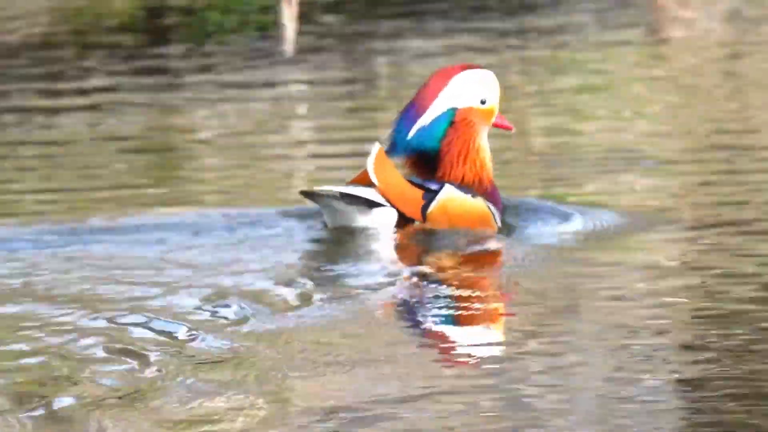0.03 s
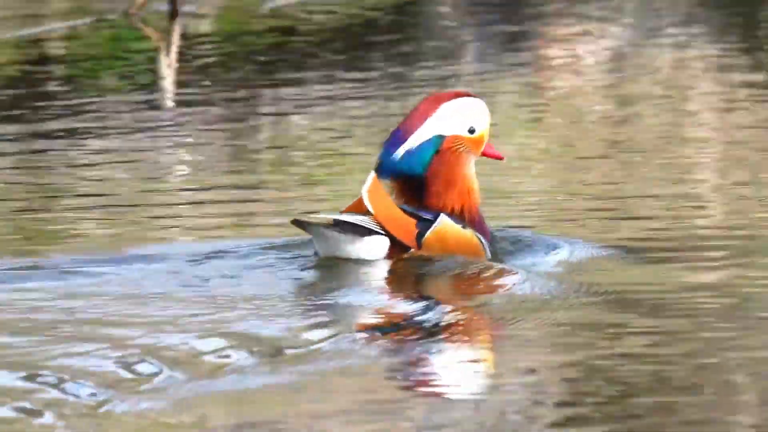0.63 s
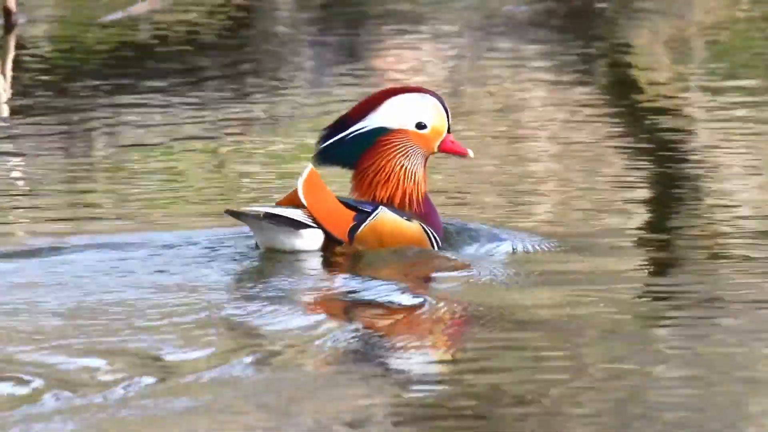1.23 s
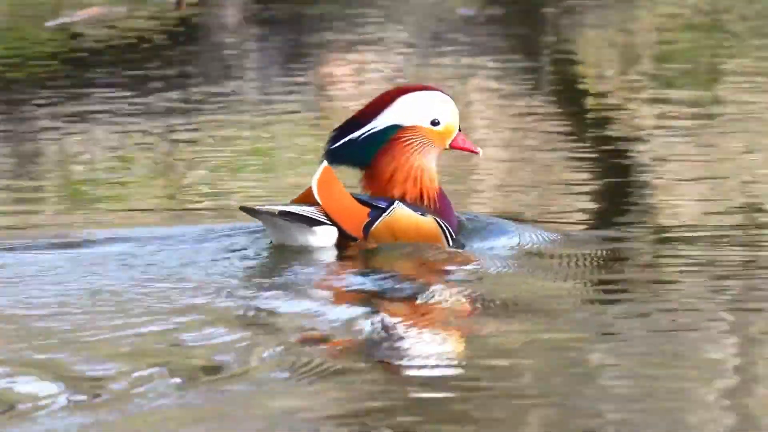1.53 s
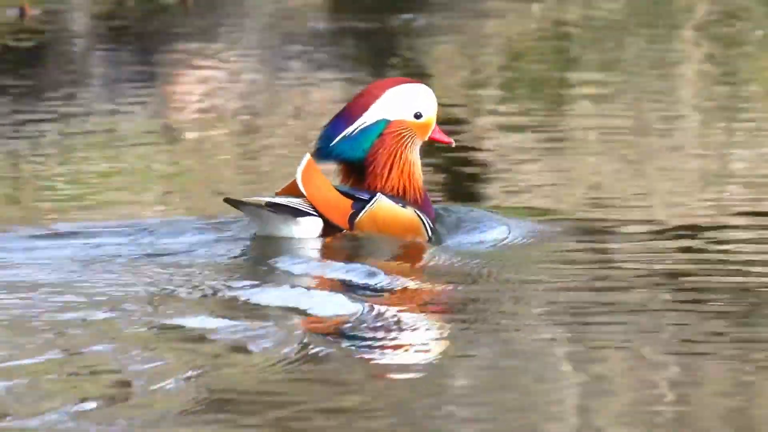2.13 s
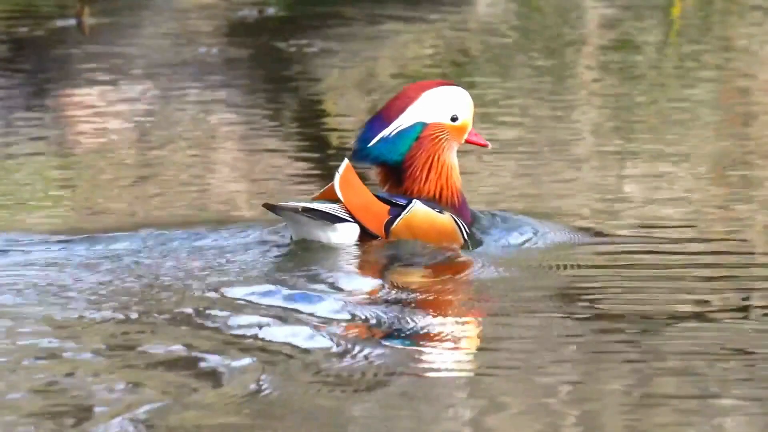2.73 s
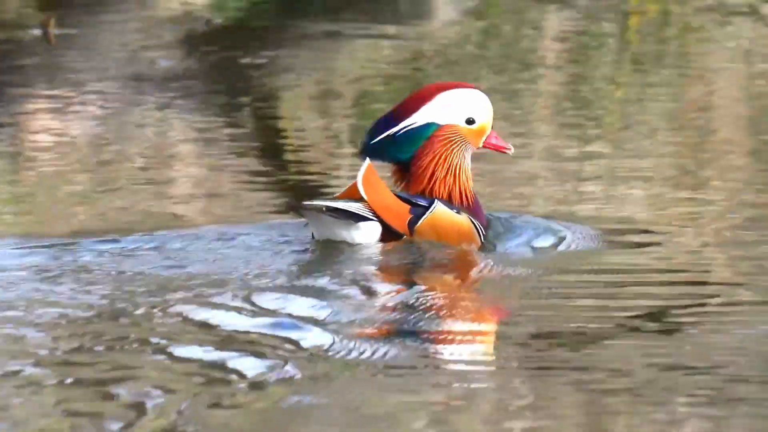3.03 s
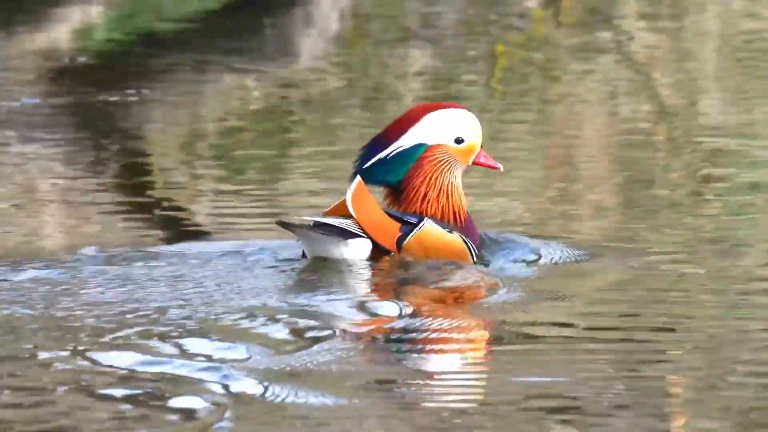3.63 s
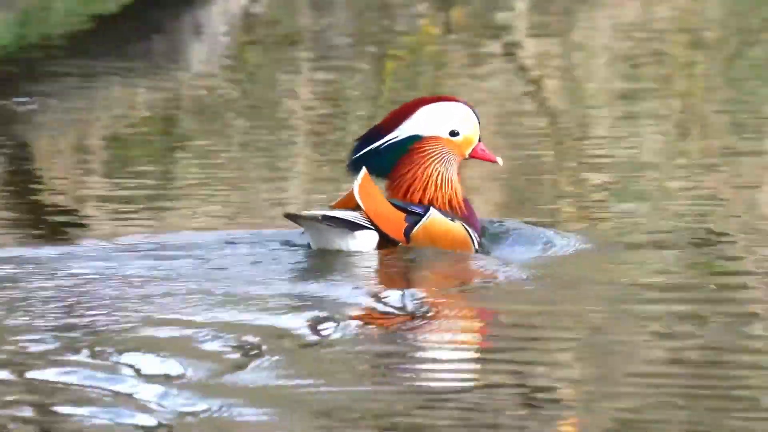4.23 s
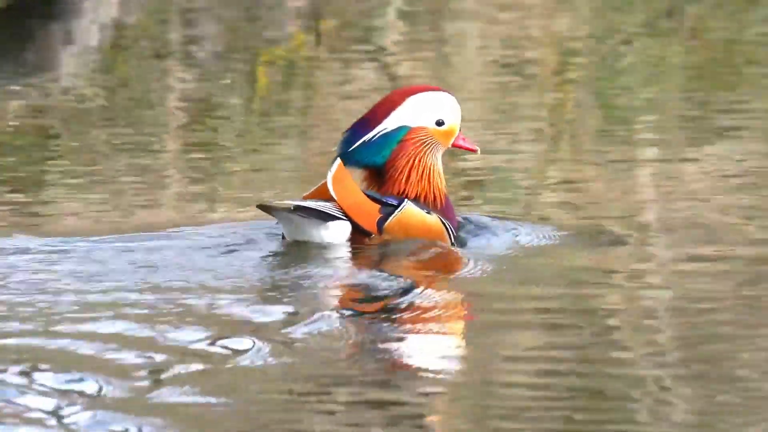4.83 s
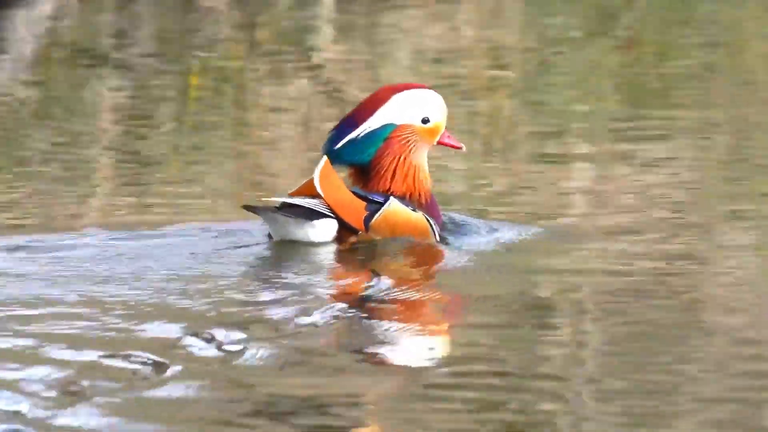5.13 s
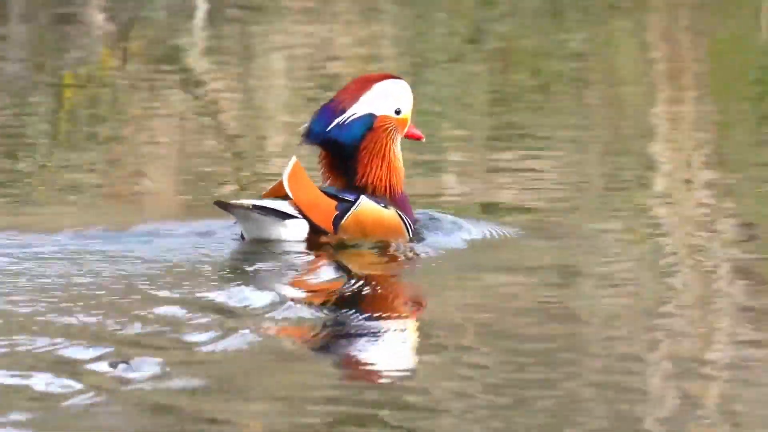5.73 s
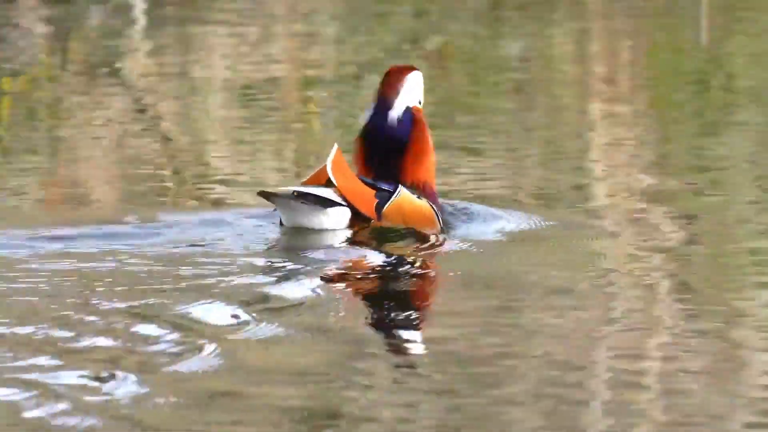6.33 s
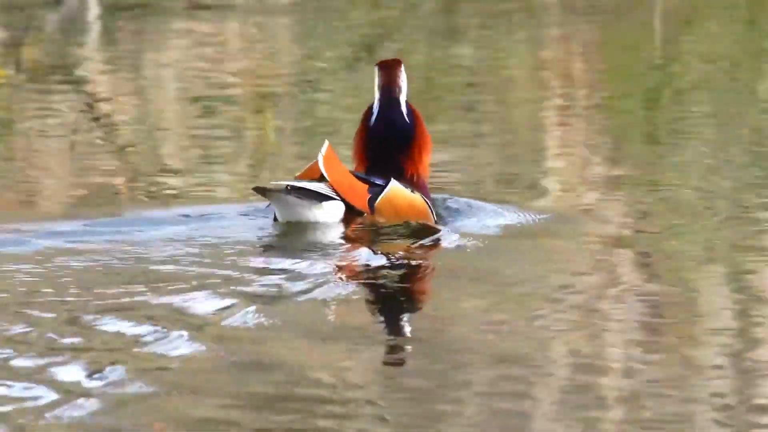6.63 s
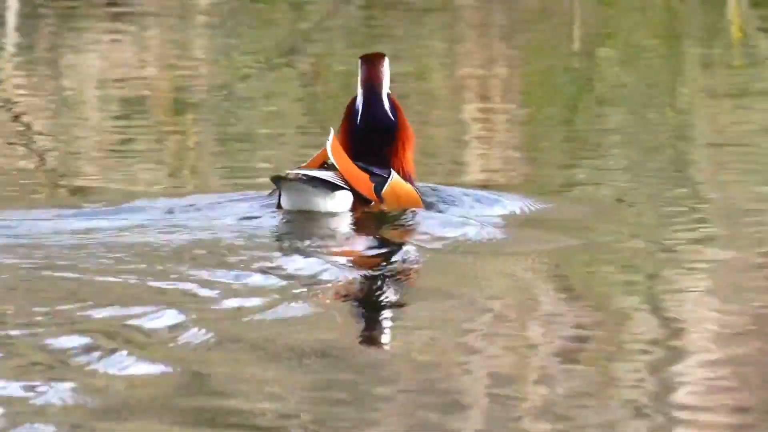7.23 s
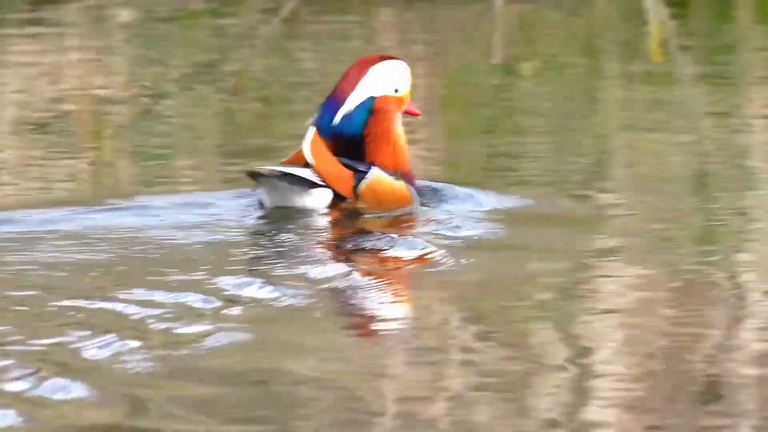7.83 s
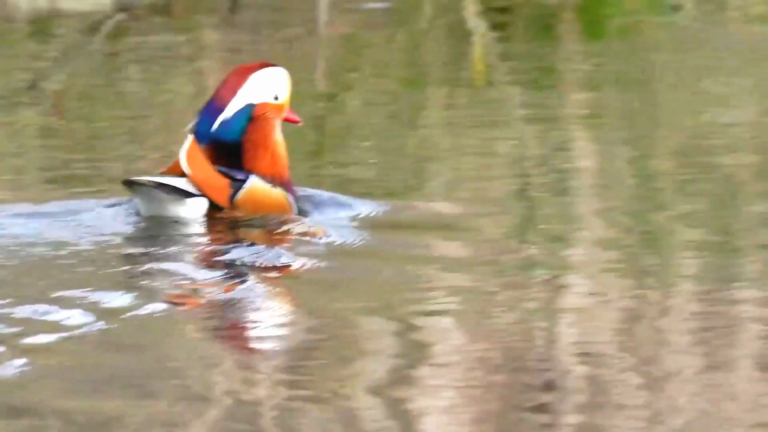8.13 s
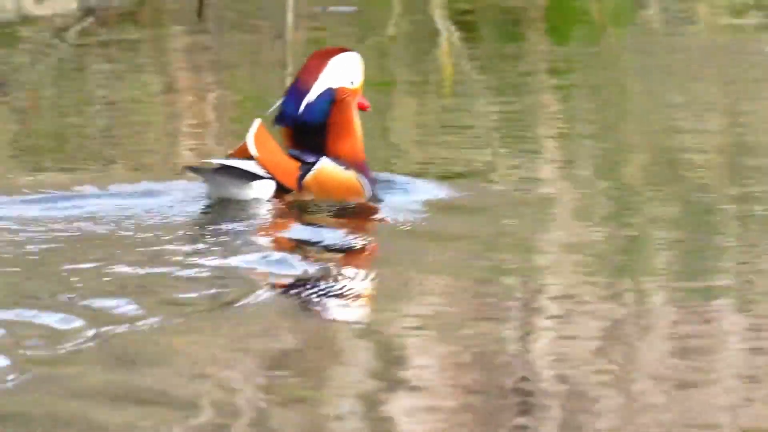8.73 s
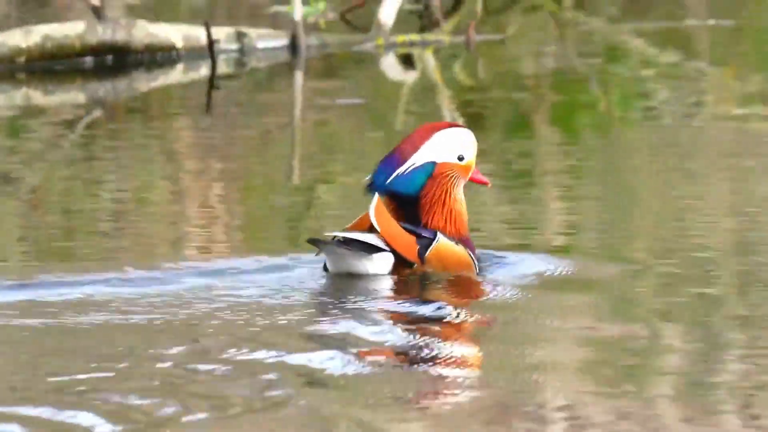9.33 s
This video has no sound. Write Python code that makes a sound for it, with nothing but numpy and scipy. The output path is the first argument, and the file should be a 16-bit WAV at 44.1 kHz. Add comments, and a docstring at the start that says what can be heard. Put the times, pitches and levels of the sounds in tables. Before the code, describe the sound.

Five brief, squeaky upward whistles from a nearby duck stand out against twittering birds and a soft outdoor hush.

```python
"""A drake on a woodland pond gives five short rising whistles: near-pure tones that climb through
the throat's resonance, flick, squeak and snap down. Songbirds pipe and twitter in gliding sine notes;
trunks and banks add long tails. A far bird rasps three times, pulses and air through a harsh throat.
Wind eddies rumble on the microphone over a faint hush; one bump ticks and rings the camera body."""
import sys
import numpy as np
from scipy import signal
from scipy.fft import rfft, irfft, next_fast_len
from scipy.io import wavfile

SR = 44100
rng = np.random.default_rng(int(sys.argv[2]) if len(sys.argv) > 2 else 0)


def wrap_up_sound(samples):
    """Save the sound to the file named by the first command line argument, as 16-bit audio."""
    columns = np.atleast_2d(samples).T
    # keep every value between -1 and 1, then stretch to whole-number steps
    tamed = np.clip(columns, -1, 1)
    steps = np.round(tamed * 32767).astype(np.int16)
    wavfile.write(sys.argv[1], SR, steps)


N = 414540

# still air and hiss, spectrum: f/Hz, relative level/dB
HUSH_SPECTRUM = [(30, -5.5), (250, 6), (450, 4), (850, 2), (1100, -3.5), (1400, -11), (2200, -15.5),
                 (3500, -8.5), (4600, -19.5), (5500, -21.5), (8000, -23.5), (15000, -24)]
# wind bands before trim: t/s, rumble/dB, throb/dB, buffet/dB
WIND_LEVELS = [(0.0, -23, -28.5, -28), (1.4, -26, -29, -25.0), (2.5, -19, -19.5, -26),
               (3.2, -21, -26.5, -28), (3.4, -22.5, -21.0, -35), (3.7, -25, -29.5, -32),
               (4.1, -23, -19.5, -29.5), (4.5, -20.5, -30, -30), (5.0, -22, -22, -20.5),
               (5.701, -18.5, -25.5, -25), (5.9, -17.5, -20, -21), (6.4, -23.5, -26, -29),
               (6.8, -18.5, -25, -28), (6.9, -25.5, -23.5, -36.5), (7.7, -31.5, -44.5, -47),
               (8.0, -37.5, -28, -40.5), (8.9, -38, -28.5, -47.5), (9.4, -24.5, -32, -30.5)]
# wind band spectra: f/Hz, relative level/dB
RUMBLE_SPECTRUM = [(10, -8), (22, 0), (35, -3.5), (50, 4), (62, -8.5), (90, -20.5), (200, -91)]
THROB_SPECTRUM = [(25, -25), (45, -4.5), (60, 1), (85, 1), (110, -8.5), (150, -28.5), (250, -64),
                  (600, -94)]
BUFFET_SPECTRUM = [(50, -33), (90, -3.5), (120, 3.5), (155, -0.5), (200, -11.5), (280, -18.5), (450, -28),
                   (1000, -58.5), (3000, -102)]
# camera body modes: f/Hz, level/dB, t60/s
BODY_MODES = [(131, -7.5, 0.15), (200, -5, 0.02), (1370, -17, 0.014)]
# bump tick spectrum: f/Hz, relative level/dB
TICK_SPECTRUM = [(300, 0), (1500, -2), (2500, -11), (5000, -21), (9000, -27), (15000, -22)]
# far hoots: t/s, length/s, f/Hz, level/dB
HOOT_NOTES = [(0.076, 0.16, 1102, -58), (0.693, 0.33, 1040, -54), (1.04, 0.13, 1272, -59),
              (2.794, 0.068, 1120, -52.5), (2.885, 0.106, 1930, -60), (3.617, 0.13, 1310, -56)]
# far see-saw song: start/s, end/s, syllable rate/Hz
TRILL_SPAN = (8.482, 9.25, 6)
# far rasps: t/s, length/s, f/Hz, level/dB
RASP_CALLS = [(5.448, 0.68, 343.4, -50), (6.352, 0.94, 336.5, -49.5), (7.306, 0.52, 341, -46.5)]
# rasping throat response: f/Hz, gain/dB
RASP_SPECTRUM = [(700, -22), (1050, 1.5), (1400, 1), (1720, 5.5), (2050, -1), (2500, -5.5), (3300, -3),
                 (4300, -8), (5200, -19.5), (6600, -12), (8000, -43), (12000, -50)]
# tiny bird's calls: t/s, level/dB
THIN_NOTES = [(.025, -51), (1.903, -52), (3.867, -48), (5.075, -54), (6.981, -54.5), (8.088, -51.5)]
# warbler notes: t/s, length/s, first f/Hz, level/dB
WARBLER_NOTES = [(0.217, .2, 5030, -50), (.766, 0.19, 5130, -65), (1.021, 0.23, 4780, -47.5),
                 (1.379, 0.14, 4800, -49), (1.712, .04, 5400, -54), (2.013, .055, 4680, -51),
                 (2.189, 0.3, 4770, -49.5), (3.458, 0.077, 4010, -48), (3.81, 0.11, 4000, -49),
                 (3.872, 0.16, 4500, -50.5), (4.153, .17, 4820, -50), (4.897, 0.11, 5050, -63),
                 (5.18, 0.11, 4930, -64), (5.47, .14, 5000, -66)]
# near chirps: t/s, length/s, middle f/Hz, fall/share of f (negative rises), level/dB
CHIRP_NOTES = [(.028, 0.065, 4230, 0.12, -48), (.134, 0.074, 3780, 0.18, -49),
               (.428, 0.055, 4250, 0.11, -42), (.578, 0.035, 3390, 0.16, -49), (.679, .076, 3600, .17, -53),
               (1.545, .12, 4080, .27, -49), (1.765, .024, 3540, .03, -44), (1.85, 0.05, 3570, 0.29, -51),
               (2.81, 0.048, 3870, 0.23, -46), (3.986, 0.076, 3700, -0.17, -42.5),
               (4.085, .09, 3580, .17, -48), (4.36, .08, 3700, .22, -41), (5.187, 0.066, 3860, 0.11, -49),
               (5.67, 0.16, 3780, 0.15, -39.5), (5.902, 0.081, 3160, 0, -46), (6.06, .096, 3140, 0, -48),
               (6.076, 0.068, 3720, 0, -45), (6.865, 0.028, 4000, 0.085, -46), (8.235, .03, 4300, .3, -50),
               (8.359, 0.084, 5800, 0.14, -55.5), (8.796, 0.034, 2915, 0.58, -48),
               (9.0, 0.028, 3700, 0.071, -44.5), (9.147, 0.023, 2560, .42, -50),
               (9.25, 0.076, 7100, 0.061, -54)]
# songbird's long low and short high whistles: t/s, f/Hz, level/dB
LOW_PIPE_NOTES = [(-.08, 3127, -34), (.478, 3115, -36), (3.122, 3095, -37.5), (3.587, 3120, -35),
                  (4.068, 3070, -35.5), (7.378, 3110, -36), (7.88, 3140, -34.5), (8.347, 3166, -34.5)]
HIGH_PIPE_NOTES = [(.246, 4080, -33), (.485, 4110, -37.5), (2.078, 4075, -32.5), (2.325, 4038, -34.5),
                   (2.535, 4034, -37), (4.065, 4160, -40), (4.288, 4086, -38.5), (5.307, 4090, -39),
                   (5.52, 4030, -40.5), (7.175, 4180, -37.5), (7.665, 4390, -45.5), (8.298, 4184, -33.5),
                   (8.521, 4100, -33.5)]
# drake calls: t/s, mid-rise f/Hz, level/dB, squeak gain/dB, first flick delay/s
DRAKE_CALLS = [(1.172, 3365, -25.5, -0.5, .043), (2.994, 3250, -26.5, 2, 0.044),
               (5.702, 3180, -28, -9, .052), (6.943, 3310, -27.5, -1, .047), (9.284, 3160, -29.5, -1, .046)]
# pitch contour of a call: t/s, ratio to mid-rise f
DRAKE_GLIDE = [(0, .42), (.114, 1.28), (.124, 1.48), (.135, 1.45), (.143, 1.13), (.152, .61), (.162, .39)]
# drake's throat resonance: ratio to mid-rise f, gain/dB
DRAKE_THROAT = [(.4, -25), (.62, -15), (.76, -7), (1, 0), (1.14, -4), (1.29, -24), (1.47, -15)]


def from_db(db):
    """Decibels to gain."""
    return 10 ** (np.asarray(db) / 20)


def unit_rms(x):
    """Scale to rms 1."""
    return x / np.sqrt(np.mean(x ** 2) + 1e-20)


def add(track, start_s, sound):
    """Mix a sound into the track at start_s."""
    at = round(start_s * SR)
    first, last = max(at, 0), min(at + len(sound), N)
    track[first:last] += sound[first - at:last - at]


def clock(length_s):
    """Sample times in s."""
    return np.arange(int(length_s * SR)) / SR


def drift(t, rate_hz):
    """Unit Gaussian points at rate_hz, linearly joined."""
    return np.interp(t * rate_hz, np.arange(4096), rng.standard_normal(4096))


def colour(x, spectrum):
    """Filter by a table of f/Hz, level/dB; rms 1."""
    hz, db = np.transpose(spectrum)
    size = next_fast_len(len(x))
    bins_hz = np.maximum(np.fft.rfftfreq(size, 1 / SR), 1)
    gain = from_db(np.interp(np.log(bins_hz), np.log(hz), db))
    return unit_rms(irfft(rfft(x, size) * gain, size)[:len(x)])


def swell(t, rise_s, fall_s):
    """Quarter-sine fade in and out."""
    rise = np.sin(np.pi / 2 * np.clip(t / rise_s, 0, 1))
    return rise * np.sin(np.pi / 2 * np.clip((t[-1] - t) / fall_s, 0, 1))


def slide(length_s, first_hz, middle_hz, last_hz, waver=.0057, flutter_db=4):
    """Trembling sine note on a parabola through three pitches."""
    t = clock(length_s)
    hz = np.polyval(np.polyfit([0, .5, 1], [first_hz, middle_hz, last_hz], 2), t / length_s)
    tremble = waver * drift(t, 120) + .009 * drift(t, 450)
    envelope = from_db(flutter_db * drift(t, 80)) * swell(t, .33 * length_s, .2 * length_s)
    return np.sqrt(2) * envelope * np.sin(phase_of(hz * (1 + tremble)))


def phase_of(hz):
    """Running phase in rad."""
    return 2 * np.pi * np.cumsum(hz) / SR


def scatter(x, t60_s, build_s):
    """Dense weak echoes from trunks and banks build up and decay."""
    t = clock(t60_s)
    echoes = rng.standard_normal(len(t)) * from_db(-60 * t / t60_s) * (1 - np.exp(-t / build_s))
    return signal.fftconvolve(x, echoes / np.linalg.norm(echoes))[:N]


def hush(level_db=-43.5):
    """Still woodland air with a faint hiss."""
    return from_db(level_db) * colour(rng.standard_normal(N), HUSH_SPECTRUM)


def wind(trims_db=(0, -2, -2)):
    """Large slow eddies rumble on the microphone; smaller ones throb and buffet."""
    times_s, *bands_db = np.transpose(WIND_LEVELS)
    spectra = RUMBLE_SPECTRUM, THROB_SPECTRUM, BUFFET_SPECTRUM
    out, t = np.zeros(N), np.arange(N) / SR
    for band_db, trim_db, spectrum in zip(bands_db, trims_db, spectra):
        envelope = from_db(np.interp(t, times_s, band_db) + trim_db)
        out += envelope * colour(rng.standard_normal(N), spectrum)
    return out


def camera_bump(start_s=7.9665, tick_db=-30, tick_decay_s=.0036, build_s=.006):
    """A tick on the camera body; its low ring builds up after."""
    out, t = np.zeros(N), clock(2 * BODY_MODES[0][2])
    ring = sum(from_db(db - 60 * t / t60_s) * np.sin(2 * np.pi * hz * t) for hz, db, t60_s in BODY_MODES)
    ring *= 1 - np.exp(-t / build_s)
    tick = colour(rng.standard_normal(len(t)), TICK_SPECTRUM) * np.exp(-t / tick_decay_s)
    add(out, start_s, ring + from_db(tick_db) * tick)
    return out


def chorus(count=130, level_db=-57, spread_db=8, high_loss_db=11):
    """Far birds: faint short notes, mostly falling; high ones fade on the way."""
    out = np.zeros(N)
    for k, (offset, height, length, loudness, lean) in enumerate(rng.random((count, 5))):
        octaves = height ** 2
        hz, glide = 3200 * 2 ** octaves, .2 * lean - .06
        gain = from_db(level_db - high_loss_db * octaves + spread_db * (loudness - .5))
        note = slide(.025 + .05 * length, hz * (1 + glide), hz, hz * (1 - glide), waver=.012)
        add(out, (k + offset) / count * N / SR, gain * note)
    return out


def hoots():
    """Low arched notes from across the water."""
    out = np.zeros(N)
    for start_s, length_s, hz, level_db in HOOT_NOTES:
        add(out, start_s, from_db(level_db) * slide(length_s, .98 * hz, hz, .98 * hz))
    return out


def trill(level_db=-47.5, range_hz=(5700, 3700), stroke_s=.055):
    """Far see-saw song: each syllable plunges, levels out, climbs back softer."""
    out = np.zeros(N)
    start_s, end_s, rate_hz = TRILL_SPAN
    for at_s in np.arange(start_s, end_s, 1 / rate_hz):
        top_hz, bottom_hz = np.array(range_hz) * rng.normal(1, .025)
        fall = slide(stroke_s, top_hz, 1.15 * bottom_hz, bottom_hz, waver=.015)
        rise = slide(stroke_s, 1.08 * bottom_hz, .88 * top_hz, 1.07 * top_hz, waver=.015)
        add(out, at_s, from_db(level_db + np.linspace(-5, 2, len(fall))) * fall)
        add(out, at_s + .062, from_db(level_db - 8) * rise)
    return out


def rasps(jitter=.02):
    """Far bird: unsteady pulses and rushing air through a harsh throat."""
    out = np.zeros(N)
    for start_s, length_s, hz, level_db in RASP_CALLS:
        t = clock(length_s)
        cycles = phase_of(hz * (1 + jitter * drift(t, 300))) // (2 * np.pi)
        pulses = unit_rms(np.diff(cycles, prepend=0))
        voice = colour(pulses + rng.standard_normal(len(t)), RASP_SPECTRUM)
        add(out, start_s, from_db(level_db) * voice * swell(t, .015, .18))
    return out


def thin_calls(length_s=.073, contour_hz=(6700, 7530, 7310)):
    """Tiny bird: a very high note rises and levels out."""
    out = np.zeros(N)
    for start_s, level_db in THIN_NOTES:
        add(out, start_s, from_db(level_db) * slide(length_s, *contour_hz))
    return out


def warbler(chip_s=.014, chip_ratio=1.3, chip_gain_db=-11, fall_hz_per_s=3900):
    """A thin chip drops onto each note, which then sinks steadily."""
    out = np.zeros(N)
    for start_s, length_s, hz, level_db in WARBLER_NOTES:
        chip = slide(chip_s, chip_ratio * hz, np.sqrt(chip_ratio) * hz, hz)
        add(out, start_s - chip_s / 2, from_db(level_db + chip_gain_db) * chip)
        fall_hz = fall_hz_per_s * length_s
        add(out, start_s, from_db(level_db) * slide(length_s, hz, hz - fall_hz / 2, hz - fall_hz))
    return out


def chirps():
    """Short straight glides from the nearer trees."""
    out = np.zeros(N)
    for start_s, length_s, hz, fall, level_db in CHIRP_NOTES:
        note = slide(length_s, hz * (1 + fall / 2), hz, hz * (1 - fall / 2))
        add(out, start_s, from_db(level_db) * note)
    return out


def pipes(notes, length_s, scoop, scoop_s, sag_hz, rise_s, flutter_db=2):
    """Songbird whistles: each scoops up to pitch, wavers, sags and drops as it stops."""
    out, t = np.zeros(N), clock(length_s)
    for start_s, hz, level_db in notes:
        waver = .005 * drift(t, 70) + .0081 * drift(t, 400) * (.5 + t / length_s)
        drop = .08 * np.exp((t - length_s) / .005)
        bend = 1 - scoop * np.exp(-t / scoop_s) - drop + waver
        phase = phase_of((hz - sag_hz * t / length_s) * bend)
        envelope = from_db(level_db + flutter_db * drift(t, 61.7)) * swell(t, rise_s, .22 * length_s)
        add(out, start_s, np.sqrt(2) * envelope * np.sin(phase))
    return out


def drake_flicks(t, count=4, every_s=.021, width_s=.0015, swing=.285, rebound=.52):
    """Evenly spaced pitch flicks, as a share of the pitch: up, then an undershoot."""
    bend = np.zeros(len(t))
    for k in range(count):
        u = (t - k * every_s) / width_s
        flick = np.exp(-u ** 2) - rebound * np.exp(-(u - 2) ** 2)
        bend += swing * rng.uniform(.75, 1.25) * flick
    return bend


def drake_whistles(choke_db_per_ratio=50, fade_from_s=.14, fade_db_per_s=150, second_harmonic_db=-41):
    """A near-pure tone climbs through the throat's resonance, flicks, squeaks and snaps down."""
    times_s, ratios = np.transpose(DRAKE_GLIDE)
    out, t = np.zeros(N), clock(times_s[-1])
    glide = np.interp(t, times_s, ratios)
    squeak = np.interp(glide, [1.25, 1.4], [0, 1])
    throat_db = np.interp(glide, *np.transpose(DRAKE_THROAT))
    fade_db = fade_db_per_s * np.maximum(t - fade_from_s, 0)
    for start_s, hz, level_db, squeak_db, flick_s in DRAKE_CALLS:
        bend = drake_flicks(t - flick_s)
        # flicks push a low tone into resonance, a high one out
        detune = np.clip(np.abs(glide * (1 + bend) - 1) - np.abs(glide - 1), -.1, .4)
        shape_db = throat_db - fade_db - choke_db_per_ratio * detune + squeak_db * squeak
        envelope = from_db(level_db + shape_db) * swell(t, .0015, .002)
        jitter = .014 * drift(t, 743)
        phase = phase_of(hz * glide * (1 + bend + jitter))
        tone = np.sin(phase) + from_db(second_harmonic_db) * np.sin(2 * phase)
        add(out, start_s, np.sqrt(2) * envelope * tone)
    return out


def scene(far_bank_delay_s=.2):
    """Close drake; the other birds arrive more by way of bank and trees. Hush, wind and bump stay dry."""
    low = pipes(LOW_PIPE_NOTES, length_s=.19, scoop=.28, scoop_s=.027, sag_hz=170.6, rise_s=.065)
    high = pipes(HIGH_PIPE_NOTES, length_s=.1002, scoop=.141, scoop_s=.00599, sag_hz=99.8, rise_s=.029)
    piping = low + high
    drake = drake_whistles()
    song = warbler() + chirps()
    thin = thin_calls()
    far = chorus() + trill() + hoots() + rasps()
    direct = drake + piping + song + thin + from_db(-5) * far
    to_bank = from_db(-11) * drake + from_db(-8) * piping + from_db(-7) * (song + thin) + from_db(-1) * far
    add(to_bank, far_bank_delay_s, from_db(-13) * piping)   # echo off the opposite bank
    to_woods = from_db(-18) * drake + from_db(-6) * (low + far) + from_db(-6.5) * high
    to_woods += from_db(-10) * song + from_db(-15) * thin
    echoes = scatter(to_bank, t60_s=.56, build_s=.005) + scatter(to_woods, t60_s=1.9, build_s=.033)
    return (direct + echoes + hush() + wind() + camera_bump())[None]


def record(dry, cutoff_hz=15050):
    """Steep elliptic low-pass."""
    return signal.sosfilt(signal.ellip(12, .1, 80, cutoff_hz, fs=SR, output="sos"), dry)


dry = scene()
out = record(dry)
wrap_up_sound(out)
```